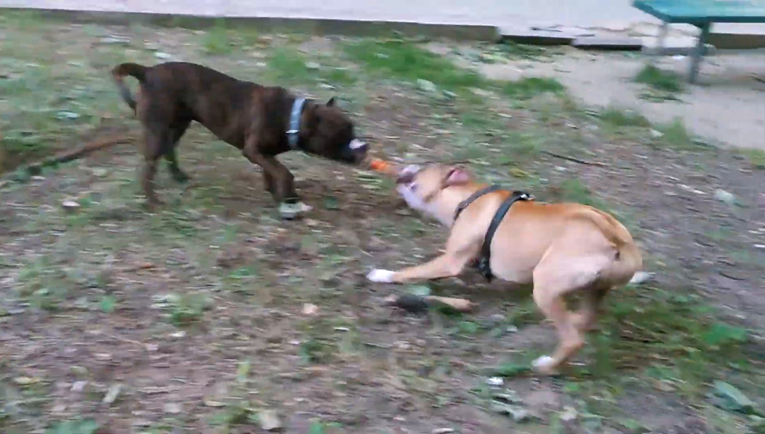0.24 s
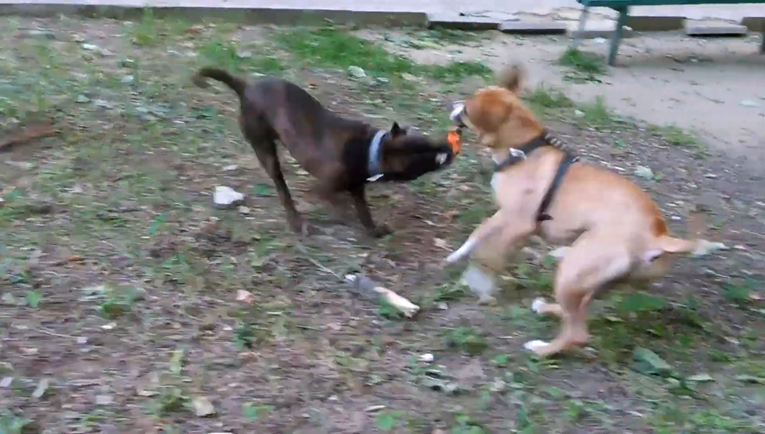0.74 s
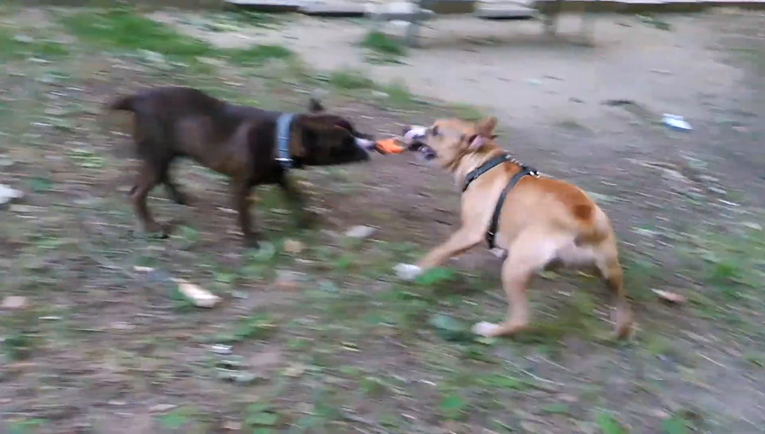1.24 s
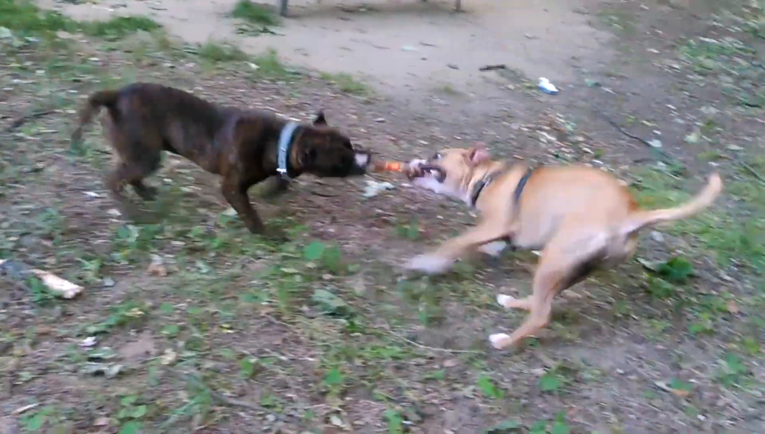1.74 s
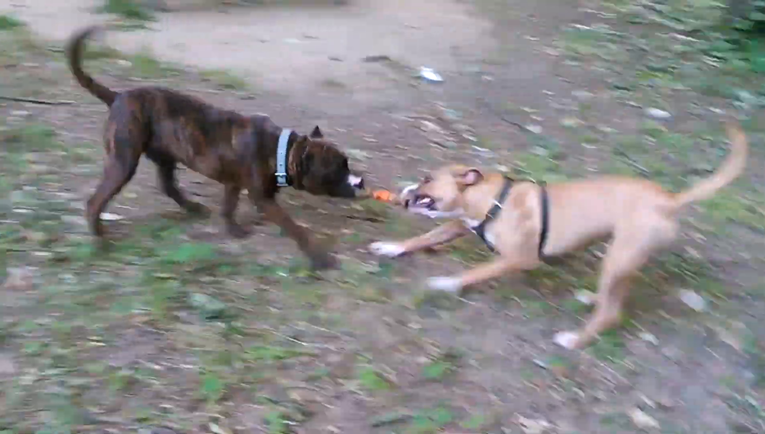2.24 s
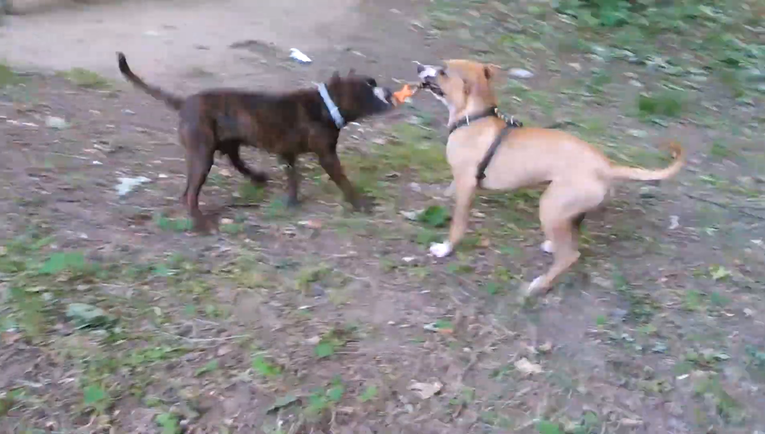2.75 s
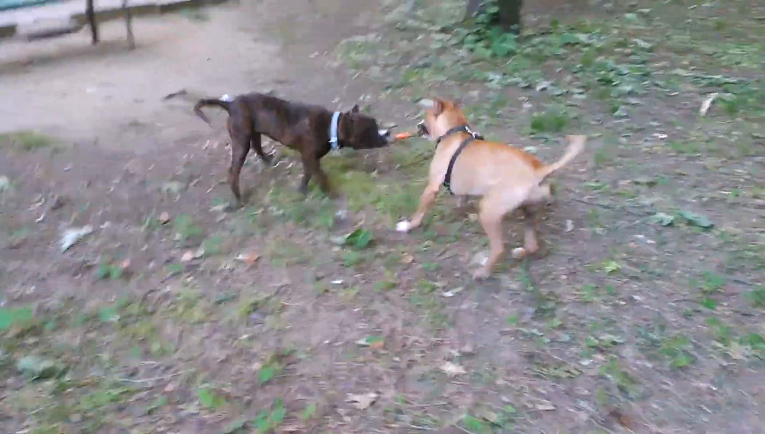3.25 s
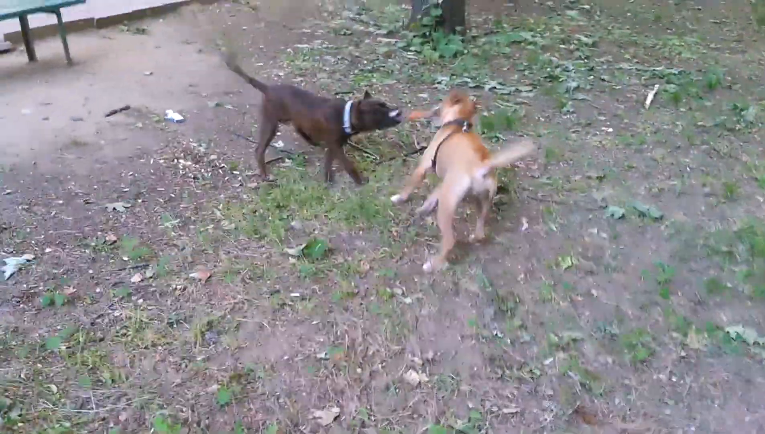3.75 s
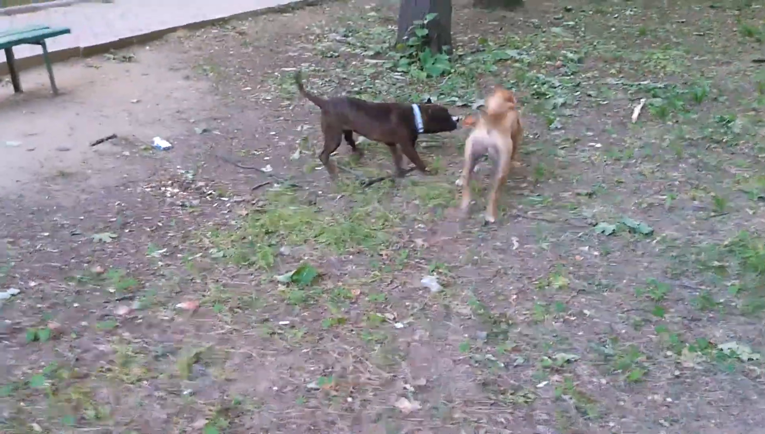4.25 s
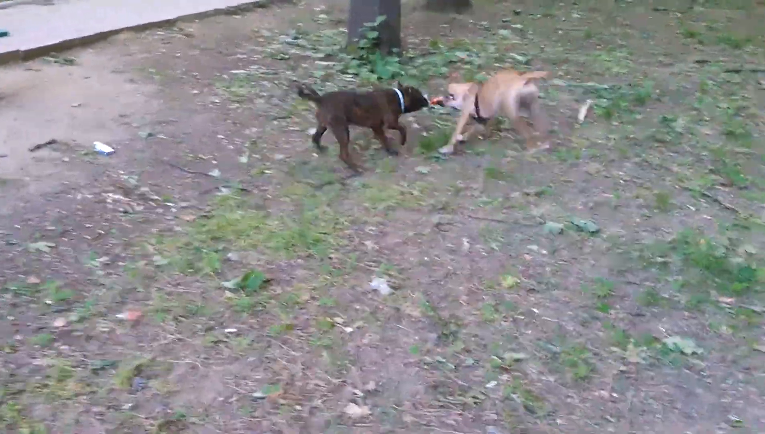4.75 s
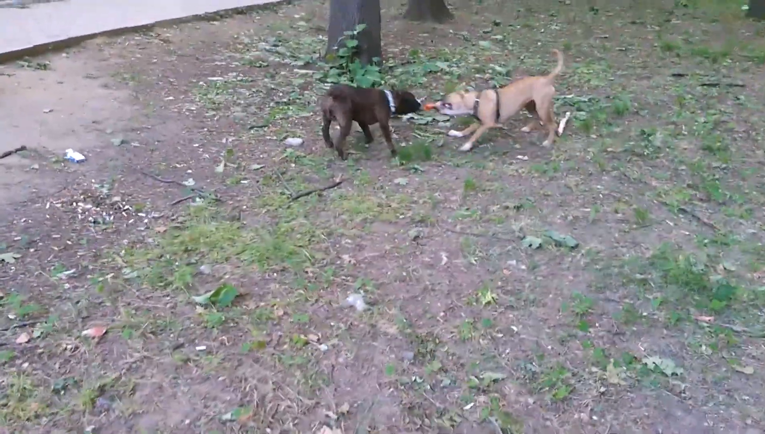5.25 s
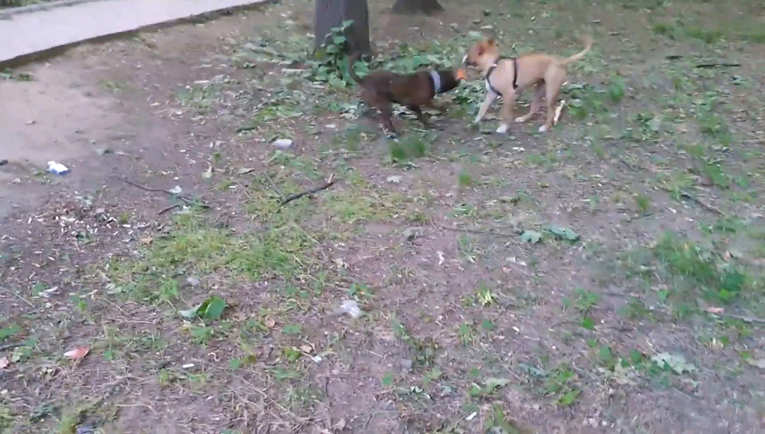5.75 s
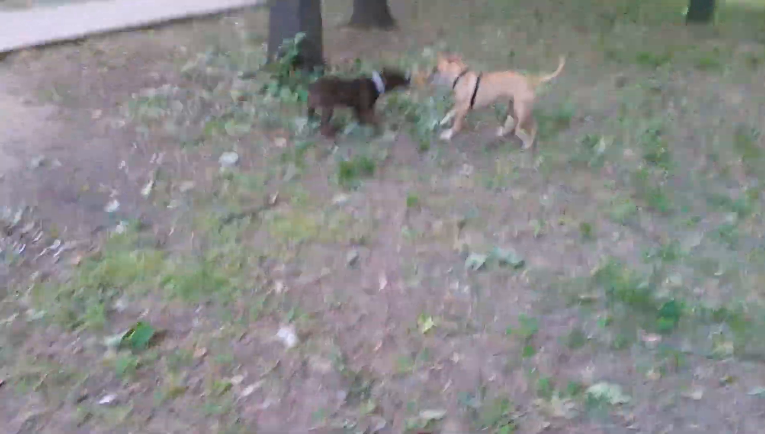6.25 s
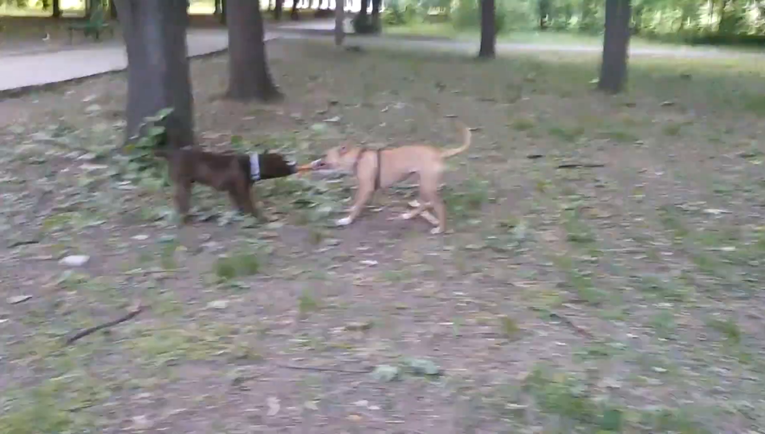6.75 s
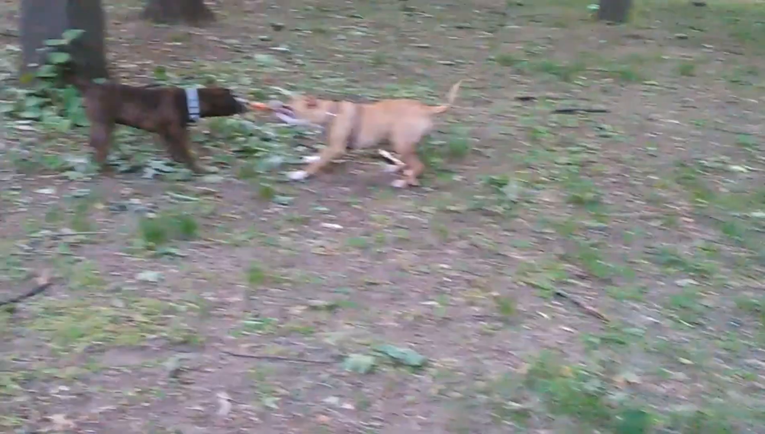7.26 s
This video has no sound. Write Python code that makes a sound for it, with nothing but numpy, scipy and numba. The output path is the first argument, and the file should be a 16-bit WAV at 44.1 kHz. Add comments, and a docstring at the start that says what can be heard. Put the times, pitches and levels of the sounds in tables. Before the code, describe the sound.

Close, rattling play growls of two tussling dogs, crackling leaf litter and snapping twigs outdoors, a few far squeals and faint bird whistles behind.

```python
"""A low town hum and paws scuffing dry leaves open the scene; almost at once two dogs growl over a tug toy.
Uneven flaps of slack vocal folds ring chest, throat and mouth, and now and then one slaps hard.
Leaves are dense random cracks, twigs snap, and landings thump the soil as bursts of low noise.
Further off come thin gliding squeals and a bird's falling whistles.
Swelling bands of noise make one brief squeak, perhaps of the toy, and later far birds twittering."""
import sys
import numpy as np
from scipy import signal
from scipy.fft import rfft, irfft
from scipy.io import wavfile
from scipy.ndimage import uniform_filter1d
from numba import njit

SR = 44100
rng = np.random.default_rng(int(sys.argv[2]) if len(sys.argv) > 2 else 0)


def file_out(sig):
    """Save sig as 16-bit WAV at sys.argv[1]."""
    # one column per channel
    cols = np.atleast_2d(sig).T
    # limit, then scale
    lim = np.clip(cols, -1, 1)
    pcm = np.round(lim * 32767).astype(np.int16)
    wavfile.write(sys.argv[1], SR, pcm)


N = 330750
T = np.arange(N) / SR

# In all tables, level is before trims and modulation; length is the span between -3 dB points
# unless noted; width is that of one band-pass, and every resonance uses two.

# spectrum of the town hum: [f/Hz, relative level/dB]
TOWN_SPECTRUM = [(25, -66), (50, -4.5), (100, 4), (150, -3.5), (240, -9.5), (350, -13), (500, 2),
                 (620, -3.5), (810, -6), (950, -1), (1120, -4), (1450, -9), (1800, -7), (3000, -13),
                 (5000, -13), (7000, -20), (15000, -31.5)]
# bands of a far drone: [f/Hz, width/Hz, level/dB]
DRONE_BANDS = [(105.7, 12.3, -44.5), (229, 91, -48.5), (824, 100, -43), (1118, 170, -47.5),
               (1820, 170, -49)]
# the drone sinks, then grows late on: [t/s, gain/dB]
DRONE_SWELL = [(0, 0), (4.5, -18), (5.6, -1), (6.6, 3.5), (7.5, 4.5)]
# how briskly the paws shuffle in the litter: [t/s, level/dB]
SHUFFLE = [(0.0, -29), (0.42, -30.5), (1.11, -26), (1.44, -33.5), (1.84, -29), (2.74, -34), (3.26, -32.5),
           (3.7, -28), (4.07, -33), (4.89, -32.5), (5.58, -28.5), (5.97, -42.5), (6.2, -26), (6.52, -37),
           (6.68, -47), (7.14, -39.5), (7.33, -32), (7.5, -32)]
# the hardest scuffs, where a dog digs in or slips: [t/s, level/dB, length/s]
SCUFFS = [(0.074, -7, 0.0028), (0.21, -11, 0.019), (.86, -7, 0.01), (.95, -8.5, 0.016), (.98, -11, 0.016),
          (1.06, -19, 0.038), (1.15, -15.5, 0.055), (1.354, -19, 0.017), (1.52, -17.5, 0.048),
          (1.733, -13.5, 0.011), (1.842, -15.5, 0.023), (2.044, -17, 0.0098), (2.371, -18.5, .016),
          (2.61, -23, 0.0086), (2.69, -21, .025), (3.02, -21, 0.09), (3.19, -18, 0.1), (3.28, -17.5, 0.017),
          (3.43, -12.5, 0.049), (3.522, -12.5, 0.043), (3.831, -15.5, 0.053), (4.14, -17.5, 0.026),
          (4.45, -11, 0.031), (4.671, -17.5, .008), (4.935, -18.5, 0.037), (5.1, -17, 0.022),
          (5.2, -16.5, 0.012), (5.5, -13.5, 0.015), (5.648, -13.5, 0.05), (5.775, -11.5, 0.056),
          (6.0, -16, 0.066), (6.212, -17, 0.011), (6.3, -14, 0.044), (6.39, -18, 0.054),
          (6.639, -16, 0.054), (7.22, -16, 0.073)]
# colour of crushed leaves: [f/Hz, relative level/dB]
LEAF_SPECTRUM = [(200, -33), (450, -10), (750, -6.5), (1500, -12.5), (3000, -12), (5000, -11),
                 (7500, -10.5), (10000, -7.5), (12500, -3), (15000, 3.5)]
# twigs snapping: [t/s, level/dB]
SNAPS = [(.86, -8), (1.137, -5), (1.152, -7), (1.264, -9), (1.412, -8.5), (1.694, -15), (2.04, -22),
         (2.172, -18), (3.522, -10), (4.125, -19), (4.318, -7), (4.467, -15), (5.979, -13), (6.14, -9)]
# heavy landings on the soil: [t/s, level/dB]
THUMPS = [(.83, -25), (1.3, -27), (2.22, -25.5), (3.16, -31), (3.66, -26), (4.52, -32), (5.0, -32),
          (5.35, -36), (5.52, -28), (5.66, -36), (6.37, -26)]
# one sub-table a growl: [t/s, level/dB, throat resonance f/Hz, mouth opening/dB]
GROWLS = [
    [(0.06, -25, 640, -8), (0.226, -23, 756, -5), (0.504, -26, 627, -1), (0.562, -26, 709, 0),
     (0.618, -24, 700, -8), (0.676, -29, 811, 3.5), (0.85, -27, 670, -4.5)],
    [(0.945, -31, 750, -7), (1.0, -34, 740, -6)],
    [(1.222, -22, 724, -13.5), (1.244, -18, 705, -15), (1.416, -19, 810, -5), (1.49, -26, 781, 0)],
    [(1.53, -32, 680, 4.5), (1.64, -22, 606, -10.5), (1.66, -22, 616, -6.5), (1.828, -28, 790, -5),
     (1.872, -20.5, 786, -13), (1.894, -32, 780, -4), (1.95, -27, 845, -4)],
    [(2.19, -17, 760, -12), (2.324, -21, 860, -4.5), (2.338, -29, 840, -1.5), (2.474, -12, 788, -17),
     (2.485, -22, 780, -25)],
    [(2.525, -24, 874, -11), (2.575, -23, 675, -3), (2.767, -19, 707, -13.5), (2.895, -26, 598, -5.5),
     (3.069, -21, 695, -11.5), (3.14, -27, 686, -1.5)],
    [(3.392, -29, 770, -14.5), (3.516, -15, 832, -14.5), (3.575, -25, 825, -11)],
    [(3.645, -27, 806, 1), (3.663, -17, 800, -7), (3.679, -25, 800, -1), (3.869, -21, 738, -4.5),
     (3.877, -18, 750, -7), (4.061, -23, 818, -8.5), (4.075, -27, 840, 0)],
    [(4.125, -20, 710, -6), (4.183, -19, 775, -12), (4.215, -27, 789, -3)],
    [(4.68, -28, 776, -1.5), (4.83, -29, 735, -12)],
    [(4.85, -19, 698, -7.5), (4.998, -26.5, 670, -3), (5.034, -20, 600, -12.5), (5.236, -21, 748, -5.5),
     (5.358, -20, 647, -5), (5.43, -25, 710, -5.5), (5.568, -22, 760, -2), (5.644, -19, 698, -11),
     (5.65, -25, 726, -8)],
    [(5.95, -34, 755, -13), (6.01, -23.5, 680, -10), (6.192, -24, 620, -3.5), (6.28, -23, 713, -4),
     (6.318, -33.5, 709, -5), (6.362, -23.5, 652, 0), (6.42, -33, 651, 0)],
    [(6.53, -34, 777, -11), (6.636, -30.5, 744, -5), (6.68, -35, 714, -2)],
    [(7.17, -26, 710, 0.5), (7.26, -26, 696, 4), (7.306, -27, 665, -1), (7.342, -28.5, 730, 6.5),
     (7.394, -20, 756, -6.5), (7.42, -33.5, 770, 2)],
]
# mouth resonance in a middling growl, set by the grip on the toy: [t/s, f/Hz]
MOUTH = [(0.3, 1200), (1.4, 1300), (2.7, 1410), (4.0, 1360), (5.0, 1180), (5.2, 1610), (6.3, 1480),
         (7.25, 1200)]
# upper resonances of the muzzle, before the jaw shifts them: [f/Hz, width/Hz, level/dB]
MUZZLE = [(1830, 230, -3), (2203, 294, -5), (2790, 450, -9.5), (3890, 610, -15)]
# chest in a middling growl: [t/s, level/dB]
CHEST = [(0, -36), (2.2, -34.5), (2.8, -38), (3.5, -31), (4.6, -37), (5.0, -28.5), (5.65, -31), (6.0, -34),
         (7.4, -33.5)]
# the loudest rasps of air through the mouth: [t/s, length/s, f/Hz, width/Hz, level/dB]
RASPS = [(0.126, 0.087, 2540, 440, -31.5), (0.352, .008, 1300, 400, -14.5), (0.54, 0.066, 1820, 400, -26.5),
         (.55, 0.053, 3000, 300, -31.5), (1.408, .06, 1210, 220, -24), (1.713, 0.044, 2650, 500, -28.5),
         (2.214, 0.035, 1890, 600, -27), (3.776, .022, 3700, 1600, -23.5), (3.776, 0.027, 1510, 584, -21),
         (3.864, 0.033, 1400, 298, -20.5), (4.724, 0.0099, 5400, 700, -21.5),
         (4.727, 0.0095, 1370, 500, -20.5), (4.751, 0.0067, 1320, 490, -13),
         (4.786, 0.008, 1210, 490, -11.5), (4.787, 0.0095, 3830, 905, -18), (5.29, 0.045, 1690, 507, -19),
         (5.56, 0.04, 1740, 300, -28.5), (7.394, 0.027, 1745, 220, -17)]
# the hardest slaps of the folds: [t/s, peak level/dB]
SLAPS = [(0.355, -9), (1.303, -5), (1.34, -13), (1.424, -9), (1.633, -12), (1.695, -8), (2.197, -7),
         (2.221, -9), (2.309, -9), (2.438, -5), (2.471, -6), (2.736, -8), (2.912, -10), (3.056, -5),
         (3.509, -4), (3.524, -8), (3.598, -8), (3.669, -10), (3.77, -8), (3.887, -8), (4.127, -11),
         (4.727, -6), (4.759, -7), (4.785, -7), (4.852, -12), (4.898, -8), (4.947, -10), (5.168, -10),
         (5.3, -10), (5.632, -10), (6.271, -12)]
# distant squeals, length from start to end: [t/s, length/s, start f/Hz, end f/Hz, level/dB]
SQUEALS = [(2.055, 0.13, 1900, 1874, -41), (5.56, 0.11, 2450, 2610, -15), (5.665, 0.15, 2644, 2715, -24),
           (6.356, .125, 1850, 2430, -24.5), (6.501, 0.25, 2330, 2640, -32)]
# falling bird slurs, length from start to end: [t/s, length/s, start f/Hz, end f/Hz, level/dB]
SLURS = [(4.14, .1, 6400, 4400, -43), (4.345, .125, 6600, 3600, -38), (4.575, .1, 6600, 4000, -36.5),
         (4.812, .115, 6700, 3500, -31.5), (5.06, .08, 4500, 2700, -33), (7.0, .07, 4600, 2900, -43)]
# first a brief squeak, perhaps of the toy, then far birds twittering:
# [t/s, length/s, f/Hz, width/Hz, level/dB]
SQUEAK_AND_TWITTER = [(4.356, 0.013, 2460, 1110, -23), (5.35, 0.23, 6250, 714, -31),
                      (5.75, 0.22, 5320, 500, -39), (6.264, 0.2, 5030, 900, -39),
                      (6.647, 0.11, 5060, 700, -38.5), (7.1, 0.13, 4340, 1007, -41.5)]

ATTACK_S, RELEASE_S = 0.0098, 0.014  # time constants shared by every growl
# level (dB), throat resonance (Hz) and mouth opening (dB) of a middling growl
USUAL_DB, USUAL_THROAT_HZ, USUAL_OPEN_DB = -24, 684, -7.5
MOUTH_SINK = 0.88  # mouth resonance sinks as the throat rises (octaves per octave)
CHEST_PER_EFFORT, CHEST_PER_OPENING = 0.46, 0.38  # the chest follows only weakly (dB per dB)
SLAP_PITCH = 1.07  # a slap rings a little above the throat resonance
SOFT_SLAPS_PER_S, SOFT_SLAP_DB = 6, 7.5  # softer ones come by chance; peak over the growl's level
STEPS_PER_S, STEP_DB = 22, 3.5  # small steps stir the litter unevenly
SNAP_S, THUMP_S = 0.0012, 0.03  # lengths between -3 dB points
SQUEAL_BEND = 2.5  # the glide slows towards its end


def undb(db):
    """Decibels to gain."""
    return 10 ** (np.asarray(db) / 20)


def unit(x):
    """Scale to rms 1."""
    return x / np.sqrt(np.mean(x ** 2))


def even(x, seconds=0.051):
    """Hold the short-term rms near 1, leaving faster flutter alone."""
    size = int(seconds * SR / 2)
    power = uniform_filter1d(uniform_filter1d(x ** 2, size), size)
    return x / np.sqrt(np.abs(power) + 1e-12)


def noise():
    """White noise."""
    return rng.standard_normal(N)


def curve(points):
    """Straight lines through a table of times and values."""
    return np.interp(T, *np.transpose(points))


def walk(rate):
    """Random wander with a spread near 1, given a new target rate times a second."""
    return 1.2 * np.interp(T * rate, np.arange(N), noise())


def colour(x, points):
    """Shape x by a (Hz, dB) spectrum, interpolated over log frequency."""
    hz, db = np.transpose(points)
    f = np.maximum(np.arange(N // 2 + 1) * SR / N, 1)
    gain = undb(np.interp(np.log(f), np.log(hz), db))
    return unit(irfft(rfft(x) * gain, N))


@njit
def svf(x, hz, width):
    """State-variable band-pass whose centre and width may move."""
    y, band, low = np.empty(len(x)), 0., 0.
    for i in range(len(x)):
        g, k = np.tan(np.pi * hz[i] / SR), width[i] / hz[i]
        v = (band + g * (x[i] - low)) / (1 + g * (g + k))
        band, low, y[i] = 2 * v - band, low + 2 * g * v, k * v
    return y


def ring(x, hz, width):
    """A steep resonance: the band-pass applied twice."""
    hz, width = np.zeros(len(x)) + hz, np.zeros(len(x)) + width
    return svf(svf(x + 1e-18, hz, width), hz, width)


def swells(rows, rise=0.52):
    """Gain bumps from (s, dB, length s) rows; rise is the share of the length before the peak."""
    out = np.zeros(N)
    for s, db, length in rows:
        near = slice(max(int((s - 3 * length) * SR), 0), int((s + 3 * length) * SR))
        u = (T[near] - s) / length
        side = np.where(u < 0, rise, 1 - rise)
        out[near] += undb(db) * 2 ** (-.5 * (u / side) ** 2)
    return out


def hisses(air, rows):
    """Narrow swells of the given air stream from (s, length s, Hz, width Hz, dB) rows."""
    out = np.zeros(N)
    for s, length, hz, width, db in rows:
        gain = swells([(s, db, length)])
        on = gain > 0
        out[on] += gain[on] * even(ring(air[on], hz, width), 0.16)
    return out


def town(hum_db=-36.5):
    """A gently swelling hum of coloured noise, with a wavering drone of narrow noise bands in it."""
    hum = colour(noise(), TOWN_SPECTRUM) * undb(hum_db + walk(1.1))
    drone = sum(undb(db) * unit(ring(noise(), hz, width)) for hz, width, db in DRONE_BANDS)
    return hum + drone * undb(curve(DRONE_SWELL))


def paws(grain_rate=5000, grain_db=3.5, hiss=0.98, litter_db=6, scuff_db=-1, snap_db=-1, thump_db=-2):
    """Dry leaves break in countless tiny cracks, twigs snap, and the soil answers landings with dull thumps."""
    struck = rng.random(N) < grain_rate / SR  # grains per second
    cracks = struck * noise() * undb(grain_db * np.minimum(rng.exponential(size=N), 5))
    crush = even(colour(unit(cracks) + hiss * noise(), LEAF_SPECTRUM), 0.019)
    shuffle = undb(curve(SHUFFLE) + litter_db + STEP_DB * walk(STEPS_PER_S))
    scuffs = undb(scuff_db) * swells(SCUFFS, rise=0.45)
    litter = np.hypot(shuffle, scuffs) * undb(2.42 * walk(150))
    snaps = undb(snap_db) * swells([(s, db, SNAP_S) for s, db in SNAPS], rise=0.55)
    landings = undb(thump_db) * swells([(s, db, THUMP_S) for s, db in THUMPS])
    soil = even(ring(noise(), 101, 62)) * landings
    return crush * (litter + snaps) + soil


def controls(tables):
    """A gate that opens for each table with a quick attack and a slower release, then every column as a curve."""
    gates = []
    for rows in tables:
        before, after = (T - rows[0][0]) / ATTACK_S, (rows[-1][0] - T) / RELEASE_S
        gates.append(np.exp(np.minimum(np.minimum(before, after), 0)))
    s, *columns = np.vstack(tables).T
    return [np.max(gates, axis=0)] + [np.interp(T, s, c) for c in columns]


def folds(hz, jitter=.2, shimmer_db=2.0, flutter_db=3.5, flutter_rate=65, other_ratio=1.25, other_db=-4):
    """Uneven flaps of both dogs' slack folds, and the flutter of lips and soft palate that shakes the stream."""
    flaps = 0
    for ratio, db in [(1, 0), (other_ratio, other_db)]:
        uneven = np.exp(jitter * walk(130) + .08 * walk(12))
        phase = np.cumsum(hz * ratio * uneven) / SR
        strength = undb(db + shimmer_db * np.clip(noise(), -2, 2))
        flaps = flaps + np.diff(np.floor(phase), prepend=0) * strength  # one pulse a cycle
    return unit(flaps), undb(flutter_db * walk(flutter_rate))


def puffs(flaps, decay_s):
    """Turbulent air that follows each flap and dies away."""
    return unit(signal.lfilter([1], [1, -np.exp(-1 / (SR * decay_s))], flaps) * noise())


def growls(pitch_hz=106, throat_width_hz=290, widening=0.11, mouth_width_hz=400, throat_db=2.5,
           mouth_db=-2, muzzle_db=-5, air=0.79, jaw=0.081, choke_db=-6, burst_db=3):
    """The flaps ring chest, throat and mouth; an open mouth damps the throat and frees the upper resonances."""
    gate, db, throat_hz, open_db = controls(GROWLS)
    effort, opening = db - USUAL_DB, open_db - USUAL_OPEN_DB
    flaps, flutter = folds(pitch_hz * np.exp(.012 * effort))  # effort tightens the folds
    voice = (flaps + air * puffs(flaps, 0.01)) * flutter
    spit = unit((.5 * flaps + puffs(flaps, .0028)) * flutter)

    throat_width = throat_width_hz * np.exp(widening * opening)
    throat = even(ring(voice, throat_hz, throat_width)) * undb(throat_db)
    mouth_hz = curve(MOUTH) * (USUAL_THROAT_HZ / throat_hz) ** MOUTH_SINK
    mouth = even(ring(spit, mouth_hz, mouth_width_hz)) * undb(open_db + mouth_db)
    # the jaw works on the toy and shifts each upper resonance
    muzzle = sum(undb(d + 2 * walk(14)) * ring(spit, f * np.exp(jaw * walk(14)), w) for f, w, d in MUZZLE)
    muzzle = even(muzzle) * undb(open_db + muzzle_db)
    chest_db = curve(CHEST) + CHEST_PER_EFFORT * effort + CHEST_PER_OPENING * opening
    chest = even(ring(voice, 165.0, 149)) * undb(chest_db)

    # the folds stick shut just before a hard slap, then the held air bursts through the mouth
    choke = undb(choke_db * np.minimum(swells([(s - .011, 0, .012) for s, _ in SLAPS]), 1))
    burst = undb(burst_db * np.minimum(swells([(s, 0, .006) for s, _ in SLAPS]), 1))
    snarl = undb(db) * choke * (throat + burst * (muzzle - mouth)) + chest
    return gate * snarl + hisses(spit, RASPS)


def slaps(rise_s=0.00404, mouth_db=-11):
    """One hard flap swells and dies in the throat within about 20 ms; the mouth rings more briefly."""
    gate, level_db, throat_hz, _ = controls(GROWLS)
    hard = [(int((s - rise_s) * SR), undb(db)) for s, db in SLAPS]  # start early, peak on time
    soft_starts = np.flatnonzero(rng.random(N) < SOFT_SLAPS_PER_S / SR)
    soft = [(i, gate[i] * undb(level_db[i] + SOFT_SLAP_DB)) for i in soft_starts]
    out, t, chance = np.zeros(N + SR), T[:SR // 25], rng.uniform(-0.88, 1, (N, 2))
    swell = (t / rise_s * np.exp(1 - t / rise_s)) ** 2
    for (start, size), (phase, spread) in zip(hard + soft, chance):
        hz = SLAP_PITCH * throat_hz[start]
        mouth_hz = hz * (1.45 + .12 * spread)
        throat = np.sin(2 * np.pi * hz * t + np.pi * phase)
        mouth = undb(mouth_db) * swell * np.sin(2 * np.pi * mouth_hz * t)
        out[start:start + len(t)] += size * swell * (throat + mouth)
    return out[:N]


def squeals(waver=0.0063, octave_db=-27, flicker_db=2):
    """Thin tones with a faint octave; each swells, glides and levels off in pitch as it fades."""
    out, wobble, flicker = np.zeros(N), 1 + waver * walk(150), undb(flicker_db * walk(70))
    for s, length, start_hz, end_hz, db in SQUEALS:
        on = (T > s) & (T < s + length)
        u = (T[on] - s) / length
        hz = (end_hz + (start_hz - end_hz) * (1 - u) ** SQUEAL_BEND) * wobble[on]
        turn = 2 * np.pi * np.cumsum(hz) / SR
        tone = np.sin(turn) + undb(octave_db) * np.sin(2 * turn)
        out[on] += undb(db) * np.sqrt(2) * np.sin(np.pi * u) * tone
    return out * flicker


def bird(waver=.018, flicker_db=3):
    """Each slur is a trembling whistle sliding down."""
    out, wobble, flicker = np.zeros(N), 1 + waver * walk(500), undb(flicker_db * walk(120))
    for s, length, start_hz, end_hz, db in SLURS:
        on = (T > s) & (T < s + length)
        u = (T[on] - s) / length
        hz = start_hz * (end_hz / start_hz) ** u * wobble[on]
        whistle = np.sin(2 * np.pi * np.cumsum(hz) / SR)
        out[on] += undb(db) * np.sqrt(2 * np.sin(np.pi * u)) * whistle
    return out * flicker


def squeak_and_twitter():
    """Swells of band-passed noise at an uneven level: a brief squeak, perhaps of the toy, then far birds."""
    return hisses(noise() * undb(4.9 * walk(30)), SQUEAK_AND_TWITTER)


def park(x, t60_s, gap_s=0.025):
    """Scattered echoes from trunks and house fronts: a decaying noise tail after a short gap."""
    t = T[:2 * SR]
    tail = rng.standard_normal(len(t)) * undb(-60 * t / t60_s) * (t > gap_s)
    return signal.fftconvolve(x, tail / np.sqrt(np.sum(tail ** 2)))[:N]


def scene():
    """Near dogs sound fairly dry; squeals carry more echo, the bird in the trees most of all."""
    dogs, squeal, song = growls() + slaps(), squeals(), bird()
    dogs = dogs + undb(-15.0) * park(dogs, .3)
    squeal = squeal + undb(-8.5) * park(squeal, 1.35)
    slurs = undb(-2) * song + undb(1) * park(song, .55, gap_s=.004)
    return (town() + paws() + dogs + squeal + slurs + squeak_and_twitter())[None]


def record(dry, top_hz=15650):
    """The microphone has two shallow notches and a steep top edge."""
    for hz, width_hz, depth in [(377, 152, 0.55), (952, 250, 0.5)]:
        dry = dry - depth * signal.lfilter(*signal.iirpeak(hz, hz / width_hz, fs=SR), dry)
    return signal.sosfilt(signal.ellip(10, .2, 75, top_hz, fs=SR, output="sos"), dry)


dry = scene()
out = record(dry)
file_out(out)
```